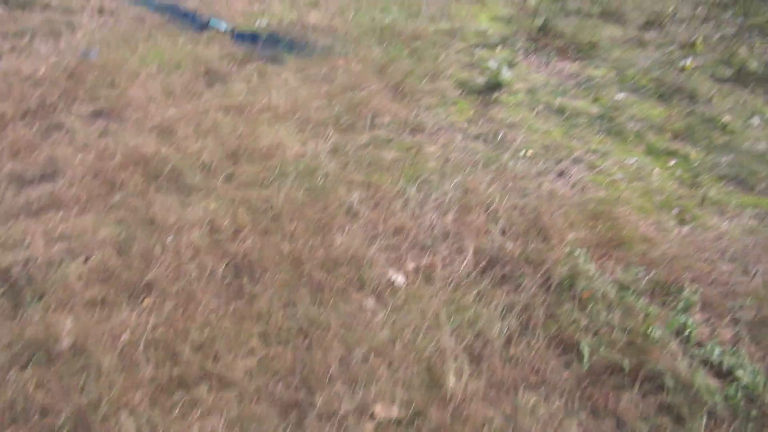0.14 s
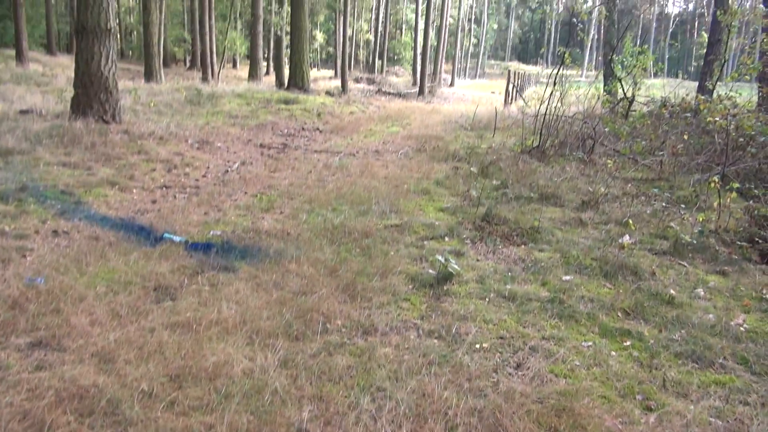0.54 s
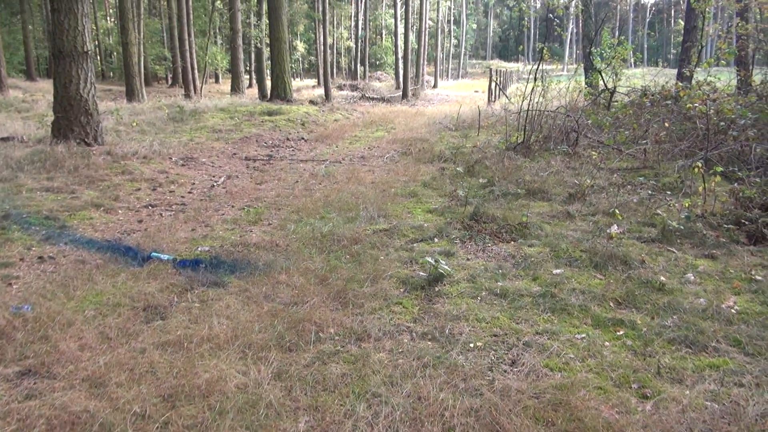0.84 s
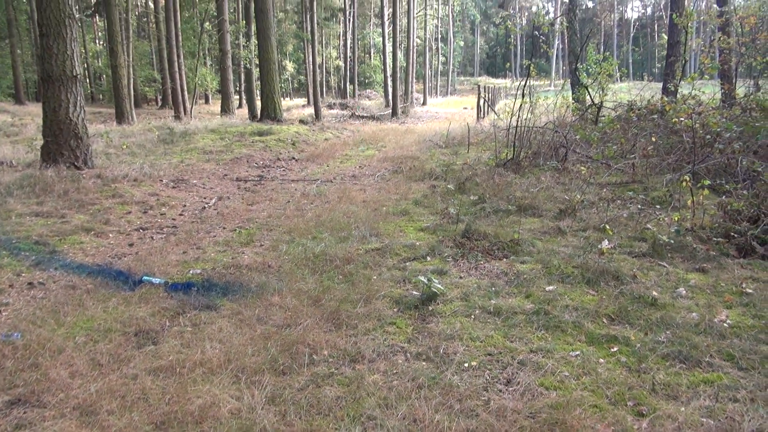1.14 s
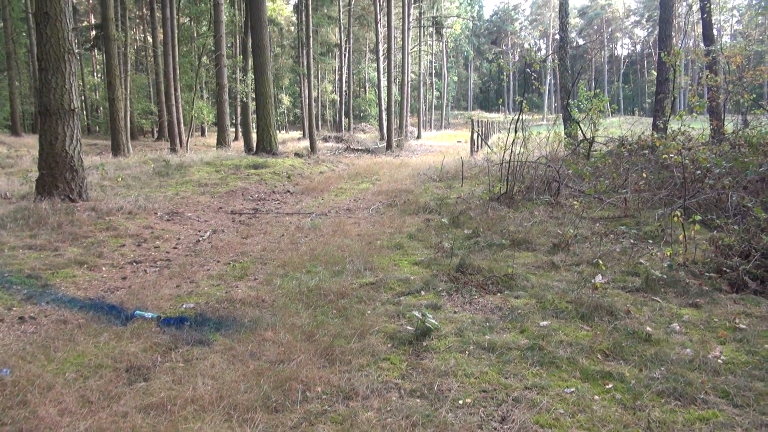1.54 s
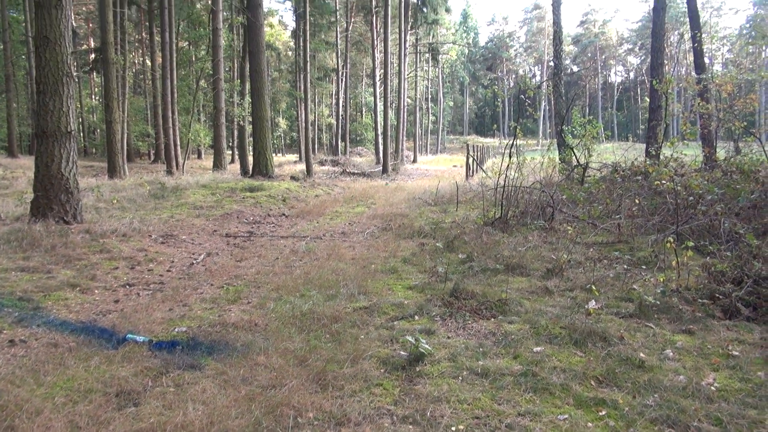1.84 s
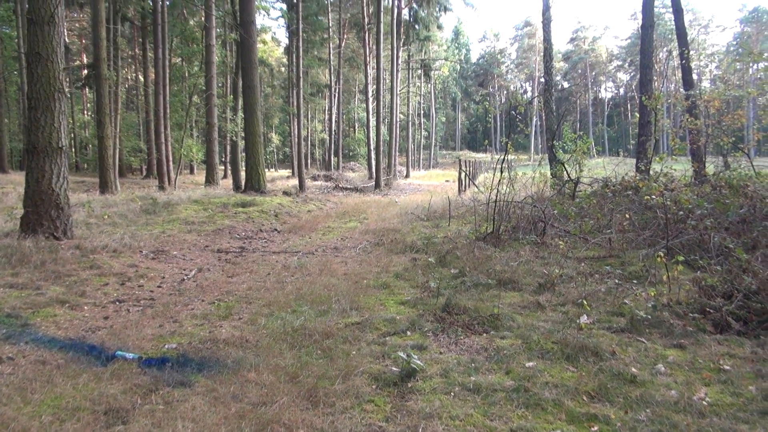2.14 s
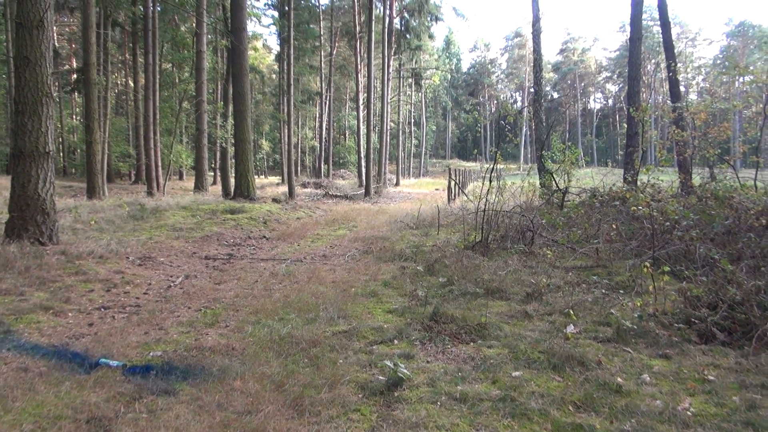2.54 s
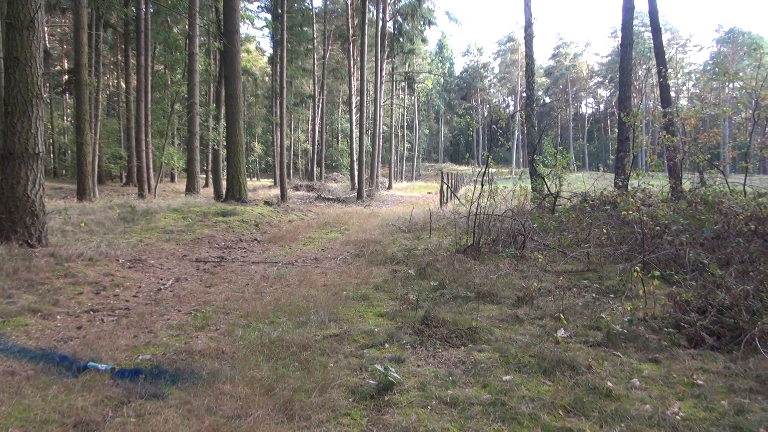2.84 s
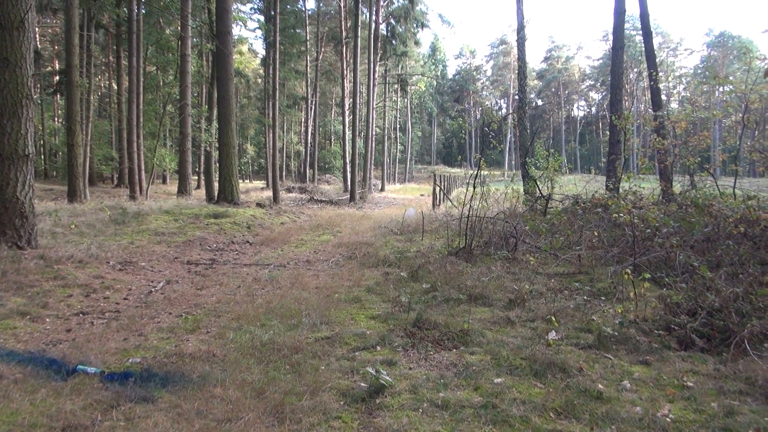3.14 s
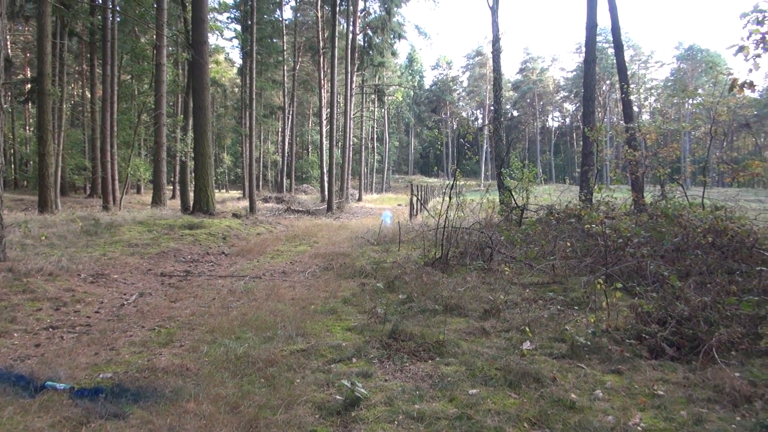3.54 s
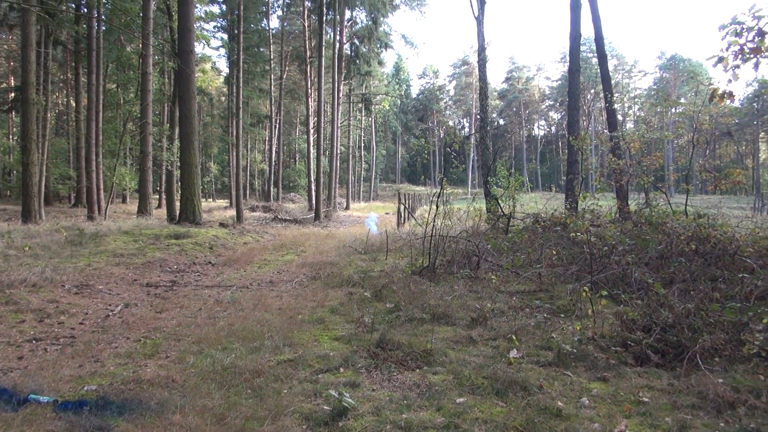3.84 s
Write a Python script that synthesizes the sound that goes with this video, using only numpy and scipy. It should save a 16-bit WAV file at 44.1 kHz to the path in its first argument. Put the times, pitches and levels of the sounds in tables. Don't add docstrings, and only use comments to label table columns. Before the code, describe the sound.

After faint wind, cloth rustle and camera ticks, one loud firecracker crack reverberates through woodland.

```python
import sys
import numpy as np
from scipy import signal
from scipy.io import wavfile

SR = 44100
rng = np.random.default_rng(int(sys.argv[2]) if len(sys.argv) > 2 else 0)


def generate_wav(signal):
    frames = np.transpose(np.atleast_2d(signal))
    scaled = np.clip(frames, -1, 1) * 32767
    pcm = np.round(scaled).astype(np.int16)
    wavfile.write(sys.argv[1], SR, pcm)


def nominal_scale(level):
    x = np.asarray(level, float) / 20
    return 10 ** x


N = 176400
T = np.arange(N) / SR
BANG_S, SUCK_S = 3.08705, .0011
# frequency in Hz, likeness 0-1.
AIR_LIKENESS = [(60, 0.21), (240, 0.68), (950, 0.76), (3770, 0.35), (15000, 0.082)]


def rms_one(x):
    return x / np.sqrt(np.mean(x ** 2) + 1e-20)


def in_time(rows):
    s, *columns = np.transpose(rows)
    return [np.interp(T, s, column) for column in columns]


def at_hz(points, hz):
    points_hz, values = np.transpose(points)
    return np.interp(np.log(hz), np.log(points_hz), values)


def high(x, hz):
    return signal.sosfilt(signal.butter(2, hz, "high", fs=SR, output="sos"), x)


def low(x, hz, order=2):
    return signal.sosfilt(signal.butter(order, hz, fs=SR, output="sos"), x)


def band(x, low_hz, high_hz):
    return signal.sosfilt(signal.butter(2, [low_hz, high_hz], "band", fs=SR, output="sos"), x)


def panned(x, db):
    return np.array([x * nominal_scale(db / 2), x * nominal_scale(-db / 2)])


def drift(rate_hz):
    r = np.exp(-80 * np.pi * rate_hz / SR)
    slow = signal.lfilter([1], [1, -2 * r, r * r], rng.standard_normal(N // 40 + 2002))[2000:]
    return np.interp(np.arange(N) / 40, np.arange(len(slow)), rms_one(slow))


def tone(hz):
    return np.sqrt(2) * np.sin(2 * np.pi * np.cumsum(hz + 0 * T) / SR + rng.uniform(0, 6))


def ring(x, hz, t60_s):
    r, w = nominal_scale(-60 / (t60_s * SR)), 2 * np.pi * hz / SR
    return signal.lfilter([0, np.sin(w)], [1, -2 * r * np.cos(w), r * r], x + 1e-18)


def struck(out, start_s, hz, t60_s, db, pan_db):
    i, more = int(start_s * SR), np.zeros((2, N))
    size = min(6000, N - i)
    click = 1. * (np.arange(size) == 0)
    more[:, i:i + size] = panned(nominal_scale(db) * ring(click, hz, t60_s), pan_db)
    return out + more


def grains(per_s, spread_db):
    size_db = spread_db * np.minimum(rng.exponential(1, (4, N)), 4)
    sizes = nominal_scale(size_db) * rng.standard_normal((4, N))
    return rms_one(sizes * (rng.random((4, N)) < per_s / SR)).reshape(2, 2, N)


def bands(source, spectrum, likeness, shape, patchy_db):
    out, together = 0, drift(3.0)
    edges_hz = 22.6 * 2 ** np.arange(0, 9.6, .5)
    mids_hz = np.sqrt(edges_hz[1:] * edges_hz[:-1])
    power = nominal_scale(at_hz(spectrum, mids_hz)) ** 2 * np.diff(edges_hz)
    total = np.sqrt(np.sum(power) * 2.2 / SR)
    for k, hz in enumerate(mids_hz):
        mid, side = band(source[k % 2], edges_hz[k], edges_hz[k + 1])
        alike = np.clip(at_hz(likeness, hz), 0, 1)
        flicker_db = patchy_db * (together / 2 + drift(15.0))
        gain = nominal_scale(at_hz(spectrum, hz) + flicker_db) * shape(hz) / total
        out = out + gain * (np.sqrt((1 + alike) / 2) * mid + np.sqrt((1 - alike) / 2) * side * [[1], [-1]])
    return out


def wind():
    # frequency in Hz, density in dB per Hz.
    wind_spectrum = [(15, -43), (25, -8.5), (352, -2.5), (710, -6), (1060, -9.5), (7230, -27.5),
                     (10500, -31), (14200, -32), (15800, -37)]
    level_db, dies_db_per_s = -50.5, .5

    def shape(hz):
        return nominal_scale(level_db - dies_db_per_s * (T - 1.0) * (hz < 6000))
    return bands(rng.standard_normal((2, 2, N)), wind_spectrum, AIR_LIKENESS, shape, patchy_db=1.26)


def motor():
    # frequency in Hz, level in dB.
    drum_orders = [(100, -65), (150, -63), (200, -66)]
    # frequency in Hz, wobble in Hz, level in dB.
    whines = [(3850, 23.3, -74.5), (5820, 23.4, -75.5), (7110, 13.3, -73.5), (7720, 27.4, -78),
              (9600, 31.4, -83), (14240, 14.4, -82)]
    # time in seconds, frequency in Hz.
    capstan_path = [(0, 14210), (.81, 14190), (.95, 14380), (1.0, 14190), (1.41, 14005), (1.64, 14130),
                    (2.09, 14030), (2.385, 14200), (2.405, 14450), (2.43, 13950), (2.475, 14400),
                    (2.545, 13885), (2.565, 14290), (2.65, 13734), (2.675, 14050), (2.74, 13744),
                    (2.8, 14020), (4, 14060)]
    # start in seconds, length in seconds, level in dB.
    focus_bursts = [
        (.87, .2, -77),
        (.9, .17, -81),
        (2.36, .16, -78),
        (1.247, .075, -65),
        (3.8, .07, -85),
    ]
    focus_pitches_hz = [10050, 9700, 10000, 4950, 10150]
    drum_hz, throb_depth = 50, 0.34
    capstan_db, capstan_wobble_hz, capstan_blur_hz = -73.5, 35, 60

    out = sum(nominal_scale(db + 2.2 * drift(13.0)) * tone(hz) for hz, db in drum_orders)
    throb = 1 + throb_depth * tone(drum_hz) / np.sqrt(2)
    for hz, wobble_hz, db in whines:
        out += nominal_scale(db + 0.57 * drift(30.)) * throb * tone(hz + wobble_hz * drift(61.0))
    top_hz, = in_time(capstan_path)
    top_hz = top_hz + capstan_wobble_hz * drift(30.2) + capstan_blur_hz * drift(300.)
    out += nominal_scale(capstan_db + 2.3 * drift(60.)) * tone(top_hz)
    for (start_s, length_s, db), hz in zip(focus_bursts, focus_pitches_hz):
        gate = np.clip(np.minimum((T - start_s) / 0.012, (start_s + length_s - T) / .04), 0, 1)
        out += nominal_scale(db + .8 * drift(20.)) * gate * tone(hz)
    return panned(out, 0.27)


def sleeve():
    # frequency in Hz, density in dB per Hz.
    cloth_spectrum = [(150, -10.5), (500, 3), (1500, -1), (4000, -8.5), (8000, -12.5), (11000, -16.5)]
    # start, swell and fade in seconds, level in dB, tilt in dB per octave about 3 kHz.
    strokes = [
        (-.05, 0.079, 0.035, -46, -1),
        (.04, 0.015, 0.26, -52.5, -3),
        (.27, 0.18, 0.16, -58.5, -2),
        (.45, 0.15, 0.085, -49, 0.5),
        (0.62, 0.059, 0.15, -48, -1),
        (.84, 0.02, 0.073, -56.5, 1),
        (1.2, 0.033, 0.14, -55.5, -1),
        (1.31, 0.063, 0.096, -53.5, -3.5),
        (1.36, 0.16, .015, -51.5, -2.5),
        (2.28, 0.078, 0.28, -63, -3.5),
    ]
    pan_db_per_octave = 3.5
    swells = [np.clip(np.minimum((T - s) / up_s, (s + up_s + down_s - T) / down_s), 0, 1)
              for s, up_s, down_s, _, _ in strokes]

    def shape(hz):
        octaves = np.log2(hz / 3000)
        height = sum(swell * nominal_scale(row[3] + row[4] * octaves) for swell, row in zip(swells, strokes))
        return panned(height, pan_db_per_octave * max(np.log2(hz / 300), 0))
    rub = bands(grains(6000, spread_db=3.0), cloth_spectrum, AIR_LIKENESS, shape, patchy_db=1.16)
    return low(rub, 11500, order=6)


def slide():
    # time in seconds, hollow pitch in Hz, level in dB.
    hollow_path = [
        (.52, 4180, -71),
        (.555, 5200, -55),
        (.58, 7000, -59),
        (.605, 8150, -59),
        (.63, 8500, -72),
    ]
    hz, db = in_time(hollow_path)
    rough = low(rng.standard_normal((2, N)), 800)
    turn = 2 * np.pi * np.cumsum(hz) / SR
    hiss = rms_one(rough[0] * np.cos(turn) + rough[1] * np.sin(turn))
    present = (T > hollow_path[0][0]) * (T < hollow_path[-1][0])
    return panned(nominal_scale(db) * present * hiss, 10)


def snaps():
    # start in seconds, peak in dB, lowest and highest Hz, pan in dB.
    snap_events = [(.287, -45, 2000, 7500, 8), (.632, -39, 3000, 11500, 12), (1.2332, -36, 900, 7000, 1),
                   (1.242, -41, 800, 4500, -4), (2.0405, -44, 5000, 12000, 3), (2.0445, -35, 700, 4500, 4),
                   (2.3105, -41, 4500, 13000, -5), (2.3335, -33, 900, 3800, -9),
                   (2.809, -48, 9000, 12500, 0), (2.9215, -36, 3500, 10000, 2),
                   (2.9235, -41, 4000, 15000, 3), (2.999, -47, 5000, 14000, 0),
                   (3.062, -45, 5500, 11000, -2)]
    decay_s, out = .0005, np.zeros((2, N))
    for start_s, db, low_hz, high_hz, pan_db in snap_events:
        i = int(start_s * SR)
        burst = rng.standard_normal(400) * np.exp(-np.arange(400) / SR / decay_s)
        burst[0] = 5
        burst = band(burst, low_hz, high_hz)
        out[:, i:i + 400] += panned(nominal_scale(db) * burst / np.abs(burst).max(), pan_db)
    return out


def shell():
    # start in seconds, level in dB, pitch in Hz, T60 in seconds.
    knocks = [(0.126, -35, 375, 0.044), (.02, -45, 522, 0.096), (.36, -43.5, 419, 0.15),
              (2.044, -40, 387, 0.063), (1.224, -19, 187, 0.014), (1.2344, -15, 214, 0.016),
              (1.242, -22, 210, 0.067), (1.259, -33, 170, .06), (2.046, -25, 182, 0.042),
              (2.501, -35, 173, 0.07), (2.809, -32.5, 523, 0.0078), (3.859, -35.5, 116, 0.13)]
    # frequency in Hz, level in dB, T60 in seconds.
    latch_modes = [(6100, -7, 0.028), (7000, -16, 0.06), (7730, -1, 0.022), (9170, -7, 0.014)]
    # start in seconds, peak in dB, pitch in Hz, pan in dB.
    ticks = [(.2317, -37, 730, 9), (.287, -40, 1510, 10), (.441, -36, 1270, 12), (.539, -43, 1500, 8),
             (.676, -44, 3200, 6), (.704, -46, 4000, 5), (.739, -38, 1800, 2), (.878, -46, 2950, 4),
             (1.234, -46, 10400, 1), (1.2345, -41, 5850, 1), (1.351, -39, 730, 6), (1.53, -46, 2480, 7),
             (2.431, -42, 1000, 10), (2.947, -53, 9500, 0)]
    latch_s, latch_db = 2.922, -35
    tick_cycles, tick_min_s, scuff_s = 6.0, .005, .0015

    out = 0
    for start_s, db, hz, t60_s in knocks:
        out = struck(out, start_s, hz, t60_s, db + 0.5, 1.0)
    out = high(out, 180)
    for hz, db, t60_s in latch_modes:
        out = struck(out, latch_s + rng.uniform(0, 0.00041), hz, t60_s * 0.6, latch_db + db, 1.0)
    for start_s, db, hz, pan_db in ticks:
        i, burst = int(start_s * SR), np.zeros(1500)
        burst[:300] = rng.standard_normal(300) * np.exp(-np.arange(300) / SR / scuff_s)
        burst[0] = 2.2
        tick = ring(burst, hz, max(tick_cycles / hz, tick_min_s)) + .03 * burst
        tick = high(tick, 300)
        out[:, i:i + 1500] += panned(nominal_scale(db) * tick / np.abs(tick).max(), pan_db)
    return out


def forest():
    # frequency in Hz, density in dB per Hz.
    near_spectrum = [(29, -56), (50, -16), (151, 2), (300, -2.5), (520, -4), (1300, -3.5), (2900, -2),
                     (7310, -13), (15800, -16.5)]
    far_spectrum = [(88, -24), (150, -14), (172, -19), (194, -15), (489, -1.5), (938, -2), (2600, -8),
                    (9000, -38.5), (11700, -83), (19800, -120)]
    # frequency in Hz, T60 in seconds.
    near_t60 = [(60, 0.29), (200, 0.49), (500, 0.44), (1200, 1), (3000, 0.65), (7000, 0.51), (11000, 0.21),
                (15000, 0.14)]
    far_t60 = [(150, 1.25), (500, 4.9), (1200, 3.55), (3000, 1.63), (9000, 0.58)]
    # frequency in Hz, hold in seconds.
    near_hold = [(100, .005), (500, 0.098), (1500, 0.07), (4000, 0.099), (8000, 0.039), (14000, .01)]
    # frequency in Hz, left-right likeness 0-1.
    echo_likeness = [(60, 1), (240, 0.7), (950, 0.84), (3770, 0.49), (15000, 0.1)]
    near_db, near_rise_s = -18.5, .008
    far_db, far_rise_s = -25.5, 0.057
    t = np.maximum(T - BANG_S - SUCK_S, 0)

    def near(hz):
        rise = 1 - np.exp(-t / (near_rise_s * min(hz / 1000, 1)))
        decay_t = np.maximum(t - at_hz(near_hold, hz), 0)
        return rise * nominal_scale(near_db - 60 * decay_t / at_hz(near_t60, hz))

    def far(hz):
        rise = 1 - np.exp(-t / far_rise_s)
        return rise * nominal_scale(far_db - 60 * (t - .5) / at_hz(far_t60, hz) - 12) * (hz < 11000)
    both = bands(grains(4000, spread_db=1.0), near_spectrum, echo_likeness, near, patchy_db=0.46)
    both += bands(rng.standard_normal((2, 2, N)), far_spectrum, echo_likeness, far, patchy_db=1.5)
    pan_db = 1.7
    return both * nominal_scale(np.array([[pan_db / 2], [-pan_db / 2]]))


def blast():
    # arrival in seconds, level in dB, pan in dB, pitch in Hz.
    trunks = [(3.1044, -13, -7, 2000), (3.1074, -16, -9, 2200), (3.1116, -3.5, -2, 1160),
              (3.1133, -12, 4, 1500), (3.1246, -7, 6, 2200), (3.1298, -14, 9, 3150), (3.1361, -13, 3, 3150),
              (3.1388, -10, 3, 2760), (3.1486, -12, 5, 2200), (3.1524, -11, 4, 1000),
              (3.1634, -16, 9, 1050), (3.1682, -14, 3, 790), (3.1796, -12, 3, 1380),
              (3.1857, -13, -3, 1100), (3.19, -13, 4, 1160), (3.1929, -13, -2, 960), (3.1994, -14, 1, 790),
              (3.2018, -15, 4, 1050), (3.2165, -12, 8, 850), (3.2229, -17, 4, 2760), (3.2317, -17, 4, 1380),
              (3.2709, -19, 2, 3150), (3.2768, -18, -1, 2450), (3.2829, -19, 2, 1100),
              (3.2989, -18, 0, 1700), (3.332, -21, 2, 960)]
    push_s, lull_s, bang_db, suck_share = .00024, .00022, 1.0, .72
    ground_hz, ground_t60_s, ground_db = 111, 0.03, -11.5
    bounce_s, bounce_hz, bounce_db = 3.0962, 340, -12.5
    spray_db, spray_t60_s, spray_hz = -14.5, 0.08, 2800

    t = T - BANG_S
    push = (t >= 0) * (t < push_s) * (1 - .2 * t / push_s)
    push = push + .15 * (t >= push_s) * (t < push_s + lull_s)
    u = np.clip((t - push_s - lull_s) / SUCK_S, 0, 9)
    suck = suck_share * 4.5 * u * np.e * np.exp(-4.5 * u)
    out = panned(nominal_scale(bang_db) * (push - suck), 0)
    out = struck(out, BANG_S + SUCK_S, ground_hz, ground_t60_s, ground_db, 0)
    out = struck(out, bounce_s, bounce_hz, ground_t60_s / 2, bounce_db, 1)
    spray = high(rng.standard_normal(N) + 0.4 * rng.standard_normal((2, N)), spray_hz)
    out += spray * (t > push_s) * nominal_scale(spray_db - 60 * np.maximum(t, 0) / spray_t60_s)

    slaps = np.zeros((2, N))
    for arrival_s, db, pan_db, hz in trunks:
        cycle = np.arange(0, 1, hz / SR)
        i = int(arrival_s * SR - len(cycle) / 4)
        slaps[:, i:i + len(cycle)] += panned(nominal_scale(db) * np.sin(2 * np.pi * cycle), pan_db)
    return low(high(out, 60) + high(slaps, 480), 10700)


def scene():
    return wind() + motor() + sleeve() + slide() + snaps() + shell() + forest() + blast()


def band_limit(x):
    return signal.sosfilt(signal.butter(12, 15960, fs=SR, output="sos"), x)


def record(dry):
    mix = np.clip(high(dry, 26), -1, 1)
    return band_limit(mix)


dry = scene()
out = record(dry)
generate_wav(out)
```